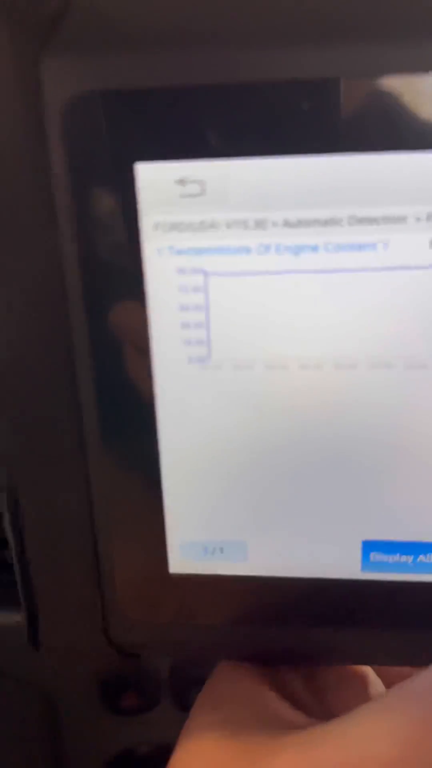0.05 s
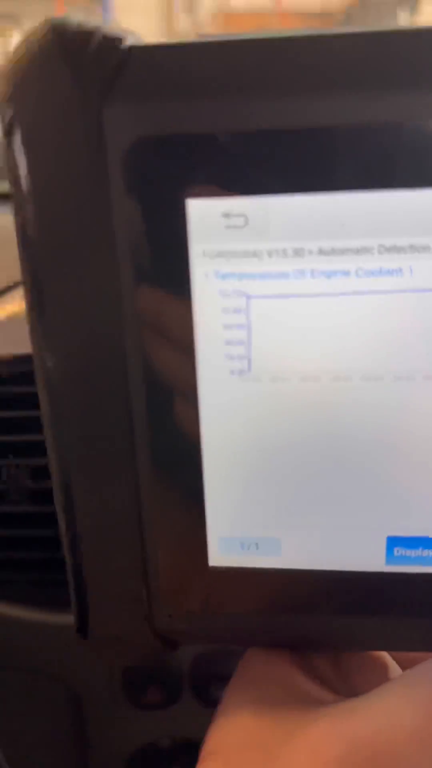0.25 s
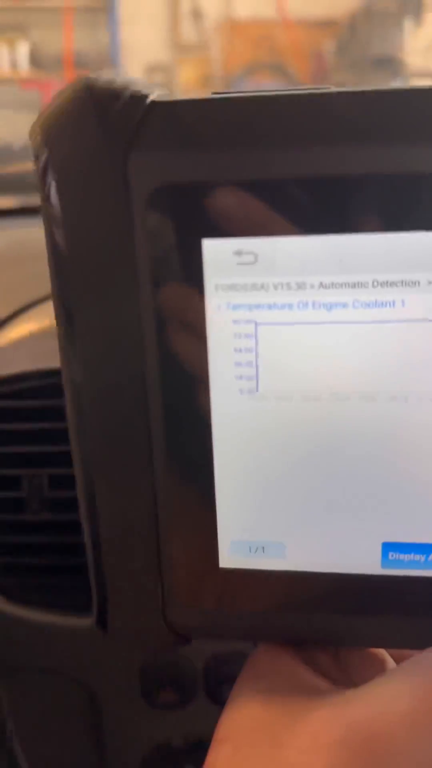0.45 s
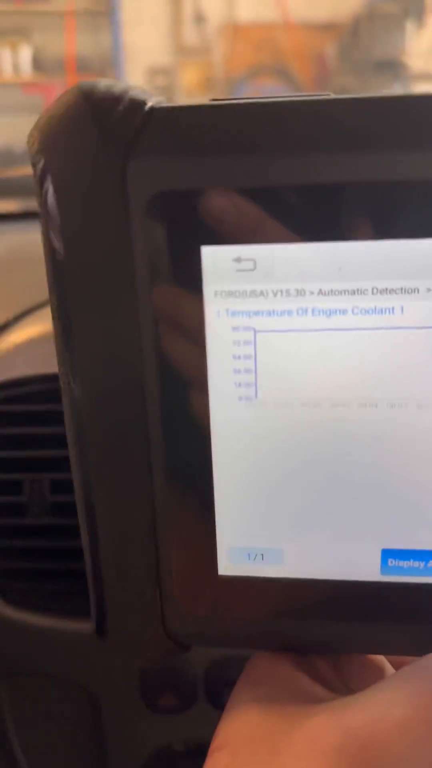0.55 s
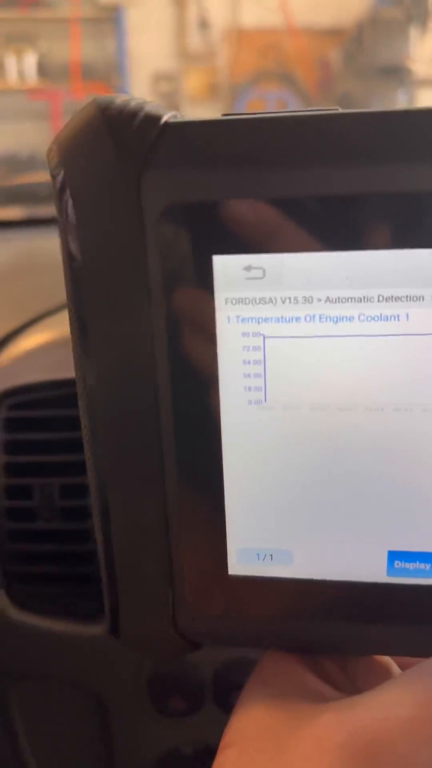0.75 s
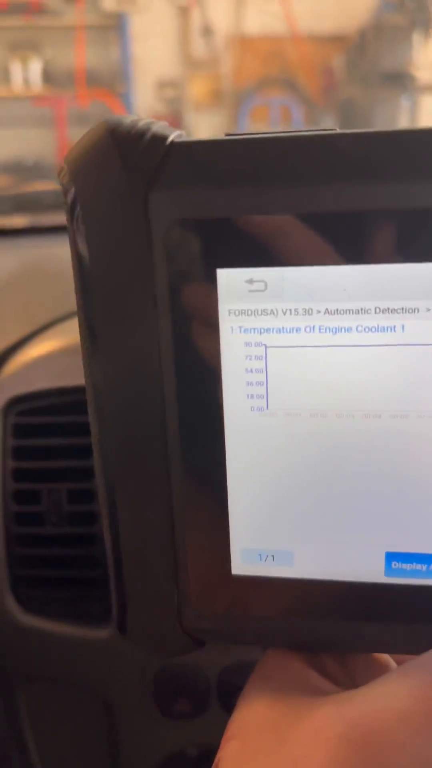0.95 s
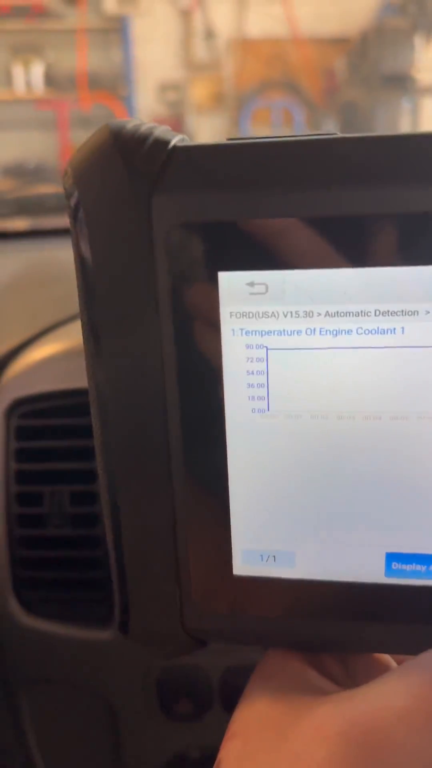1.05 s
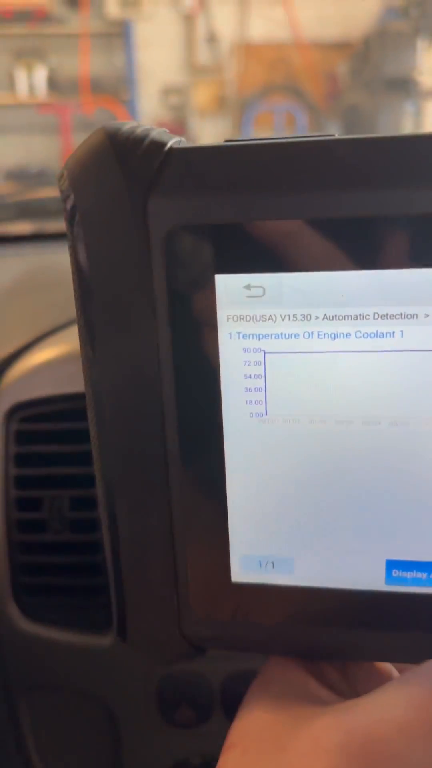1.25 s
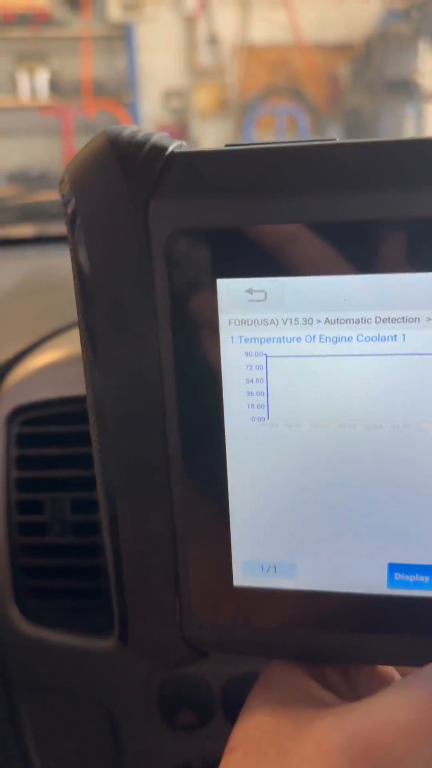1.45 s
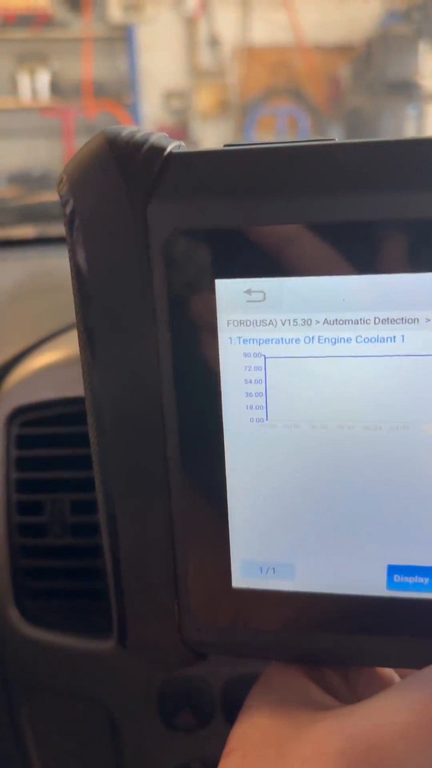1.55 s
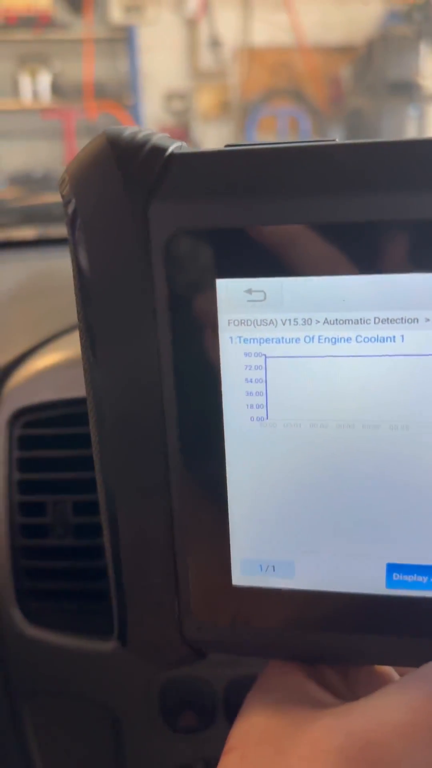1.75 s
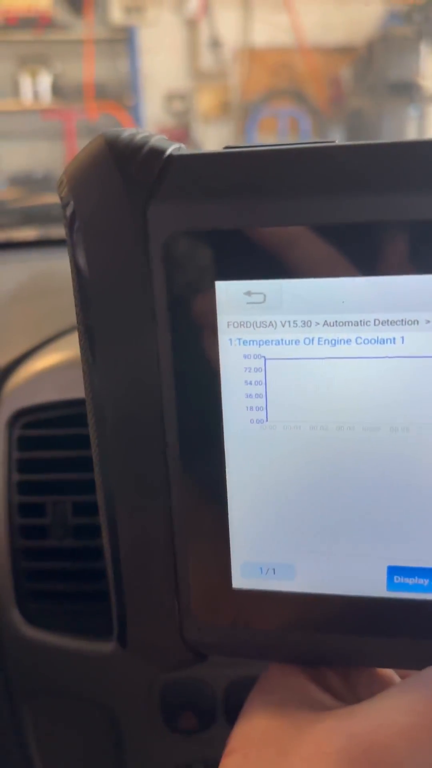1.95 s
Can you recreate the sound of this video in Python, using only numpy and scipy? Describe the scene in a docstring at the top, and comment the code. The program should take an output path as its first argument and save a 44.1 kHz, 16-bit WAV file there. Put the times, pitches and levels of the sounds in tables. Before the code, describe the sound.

A six-cylinder car engine idles in a deep, steady boom inside the cabin, with faint whine and soft rush; a hand rustles lightly early, plastic ticks once late, then the idle dips slightly as rustling returns.

```python
"""A V6 car engine idles, heard inside the cabin on the two ports of a hand-held phone.
From the start its firings boom as a sum of crank orders, under an alternator whine and accessory hums
of wavering pitch, with mechanical rush and hiss as shaped noise. The hand rustles early on, as bursts
of resonant noise; near 1.6 s plastic ticks, as decaying modes. Towards the end the idle sags, uneven
orders and low rush swell, the boom dips and the hand rustles again."""
import sys
import numpy as np
from scipy import signal
from scipy.fft import rfft, irfft
from scipy.io import wavfile
from scipy.ndimage import uniform_filter1d

SR = 44100
rng = np.random.default_rng(int(sys.argv[2]) if len(sys.argv) > 2 else 0)


def transcribe(signal):
    """Save signal, clipped to [-1, 1], as a 16-bit WAV file at the path in sys.argv[1]."""
    frames = np.atleast_2d(signal).T
    limited = np.clip(frames, -1, 1)
    pcm = np.round(limited * 32767).astype(np.int16)
    wavfile.write(sys.argv[1], SR, pcm)


def volts(x):
    """Linear amplitude factor 10**(x/20) for a level x in dB, scalar or array-like."""
    e = np.asarray(x, float) / 20
    return 10 ** e


N = 88200

# The idle speed. Each row: time in seconds, crank speed in rpm.
CRANK_SPEED = [(0.0, 891.0), (0.2, 885.4), (0.4, 881.6), (0.6, 888.0), (0.8, 890.2), (1.0, 881.8),
               (1.2, 879.8), (1.4, 881.6), (1.6, 877.7), (1.72, 871.1), (1.82, 863.2), (1.92, 866.6),
               (2.0, 866.7)]
START_TURNS = .185  # crank position at the start, in turns
# The engine's harmonic recipe; 3 is the firing, steps of 1.5 one bank, steps of .5 single cylinders.
# Each row: multiple of crank speed, rms level in dB before its drift.
ORDER_LEVELS = [(2, -56), (3, -21), (4, -55), (4.5, -32.7), (6, -29.5), (7.5, -39), (8, -53), (9, -35.5),
                (10.5, -46), (11.5, -52), (12, -40), (13, -55), (13.5, -40.5), (14, -49), (14.5, -47.5),
                (15, -35.5), (15.5, -43), (16, -56), (16.5, -55), (17.5, -52), (18, -48), (20.5, -59),
                (21, -56), (24, -61), (27, -58), (30, -63)]
# The firing boom as the phone moves in the cabin's standing wave. Each row: time in seconds, gain in dB.
BOOM_DRIFT = [(0, 2.5), (.25, 0), (.45, -0.5), (.65, 1.5), (.92, 1.4), (1.02, -0.5), (1.3, 0.1),
              (1.65, -0.5), (1.82, -5), (1.92, -0.5), (2, -8.5)]
# Drift at twice the firing rate. Each row: time in seconds, gain in dB.
SECOND_FIRING_DRIFT = [(0, 0), (.12, -1), (.36, -1), (.5, -1), (.72, -2.5), (.9, 1), (1.1, -2), (1.25, 0),
                       (1.43, -.5), (1.6, 2), (1.85, 1), (2, 1)]
# Drift at five times the firing rate. Each row: time in seconds, gain in dB.
FIFTH_FIRING_DRIFT = [(0, -1), (1.74, .5), (1.86, -4.5), (2, 1)]
# Uneven orders and low rush grow as the idle sags. Each row: time in seconds, gain in dB.
STUMBLE = [(0, -2.5), (1.3, 1), (1.6, 2), (1.8, 5), (2, 8)]
# The orders that follow the stumble, as multiples of crank speed.
STUMBLE_ORDERS = (14.5, 18, 20.5)
# Stereo balance of the engine. Each row: frequency in Hz, left over right in dB.
ENGINE_BALANCE = [(44, .4), (66, .6), (88, 1.5), (130, .9), (250, .9), (700, 5)]
# The alternator whine. Each row: time in seconds, pitch in Hz, rms level in dB, both before wavering.
WHINE = [(0, 1410, -62), (.23, 1409, -59), (.33, 1400, -65), (.42, 1407, -60.5), (.58, 1405, -60.5),
         (.72, 1412, -57.5), (.81, 1412, -60), (.95, 1413, -57.5), (.99, 1398, -62.5), (1.3, 1402, -62),
         (1.6, 1395, -61), (1.72, 1397, -63.5), (1.82, 1412, -61.5), (2, 1388, -64)]
# Accessory hums. Each row: multiple of crank speed, pitch wander in Hz, level in dB before its swell,
# left over right in dB.
HUMS = [(41.54, 8, -62.5, 7.5), (52.08, 2.7, -70, 11.5)]
# Swell shared by the hums. Each row: time in seconds, gain in dB.
HUM_SWELL = [(0, 4.5), (.1, -6.5), (.2, 1.5), (.5, -1), (.6, -5.5), (.73, 2.5), (.88, -7), (1.05, 2),
             (1.5, -2.5), (1.6, 3.5), (1.72, 2.5), (1.85, 2), (2, 4.5)]
# Rush heard alike by both ports. Each row: frequency in Hz, density in dB per Hz before the port trims.
RUSH_MID = [(20, -88.5), (40, -73), (200, -73.5), (280, -72.5), (370, -76), (500, -80), (1000, -89),
            (1600, -93), (2100, -99), (2500, -98.5), (3300, -101), (4100, -101), (5100, -106), (7000, -104),
            (8500, -111), (9700, -111), (10300, -116), (10420, -150)]
# Rush that differs between the ports. Each row: frequency in Hz, density in dB per Hz before the trims.
RUSH_SIDE = [(20, -100), (60, -89), (310, -82), (600, -88), (1300, -103), (1700, -108), (2300, -100),
             (3000, -93.5), (3500, -101), (4500, -103), (4850, -99), (5200, -106), (5500, -102),
             (6000, -111), (6600, -107), (8000, -107), (8700, -112), (9800, -110), (10700, -116),
             (11300, -132), (13000, -124), (15600, -126), (15900, -150)]
# Narrow hiss. Each row: centre in Hz, width in Hz, rms level in dB before the port trims.
HISS = [(5490, 260, -75.5), (5760, 200, -80)]
# Hand rustles. Each row: start in seconds, length in seconds, level in dB before its swell and flutter,
# centre in Hz, width in Hz.
RUSTLES = [(.17, .22, -74.5, 3630, 400), (.2, .22, -70.5, 3200, 2200), (.4, .11, -72, 3150, 1300),
           (1.85, .3, -71, 2350, 1300)]
# Modes of the ticking plastic. Each row: frequency in Hz, relative level in dB, 60 dB decay in seconds.
TICK_MODES = [(2600, 0, .004), (3300, -2, .005), (2050, -8, .012), (2580, -12, .04), (7800, -12, .02)]


def table(rows, at, log=False):
    """Read every column after the first at given places, between rows by straight or log steps."""
    rows = np.array(rows, float)
    scale = np.log if log else np.asarray
    return np.array([np.interp(scale(at), scale(rows[:, 0]), column) for column in rows.T[1:]])


def walk(rate):
    """Random levels held for 1 / rate seconds and slewed twice; spread near 1."""
    hold = int(SR / rate)
    steps = np.repeat(rng.standard_normal(N // 400), hold)[:N]
    return 1.7 * uniform_filter1d(uniform_filter1d(steps, hold), hold)


def coloured(rows, white):
    """Shape a white noise spectrum to a density in dB per Hz."""
    hz = np.arange(1, N // 2 + 2) * SR / N
    gain = volts(table(rows, hz, log=True)[0])
    return irfft(white * gain, N) * np.sqrt(SR / 2)


def band(hz, width_hz, db):
    """Noise through one resonance twice, at an rms level in dB."""
    peak = signal.iirpeak(hz, hz / width_hz, fs=SR)
    once = signal.lfilter(*peak, rng.standard_normal(N))
    twice = signal.lfilter(*peak, once)
    return twice * volts(db) / np.std(twice)


def tone(gain, phase, pan_db, lag_rad):
    """Place a sine of rms gain on the two ports, panned left over right, the right one lagging."""
    left = np.sqrt(2) * gain * np.sin(phase)
    right = np.sqrt(2) * gain * np.sin(phase - lag_rad)
    return np.array([left * volts(pan_db / 2), right * volts(-pan_db / 2)])


def cabin_lag(order, hz):
    """Phase lag in radians of an order on its way into the cabin, by firing, bank or single cylinder."""
    if order % 3 == 0:
        # a panel resonance delays the firing orders above it
        panel_hz, panel_width_hz = 237, 45
        return 2 * np.arctan2(hz * panel_width_hz, panel_hz ** 2 - hz ** 2)
    if order % 1.5 == 0:
        # the bank beat lags, and above a knee comes by a longer pipe
        bank_rad, knee_hz, pipe_delay_s = .72, 105, .0083
        return bank_rad + 2 * np.pi * pipe_delay_s * max(hz - knee_hz, 0)
    # other orders are reversed up to the ringing order, then lag by a limited angle
    ring_order, most_rad = 14, 1.5
    return min(order - ring_order, most_rad) if order > ring_order else np.pi


def engine(t, turns, crank_hz):
    """Firing pressure as sines locked to the crank, each wavering a little in level and phase."""
    scatter_db, sway_rad, rate_per_s = .9, .12, 11
    drift_db = {3: table(BOOM_DRIFT, t)[0], 6: table(SECOND_FIRING_DRIFT, t)[0],
                15: table(FIFTH_FIRING_DRIFT, t)[0]}
    for order in STUMBLE_ORDERS:
        drift_db[order] = table(STUMBLE, t)[0]
    out = 0
    for order, db in ORDER_LEVELS:
        hz = order * crank_hz
        loose = .3 if order <= 4.5 else 1  # the lowest orders waver less
        gain = volts(db + loose * scatter_db * walk(rate_per_s) + drift_db.get(order, 0))
        sway = loose * sway_rad * walk(rate_per_s)
        phase = 2 * np.pi * order * turns - cabin_lag(order, hz) + sway
        if order == 3:
            # the boom falls behind as it weakens
            phase = phase - .12 + .06 * drift_db[3]
        pan_db = table(ENGINE_BALANCE, hz, log=True)[0]
        out = out + tone(gain, phase, pan_db, lag_rad=.072)
    return out


def alternator(t):
    """The alternator whine: one sine, its pitch and level trembling around their drift."""
    hz, db = table(WHINE, t)
    phase = 2 * np.pi * np.cumsum(hz + 2.5 * walk(40)) / SR
    gain = volts(db + 1.5 * walk(70))
    return tone(gain, phase, pan_db=4.5, lag_rad=.66)


def accessory_hums(t, turns):
    """Belt-driven hums: sines that follow the crank, with pitch wander and a shared swell."""
    out = 0
    for order, wander_hz, db, pan_db in HUMS:
        wander_turns = np.cumsum(wander_hz * walk(35)) / SR
        phase = 2 * np.pi * (order * turns + wander_turns)
        gain = volts(db + table(HUM_SWELL, t)[0] + 2.56 * walk(25))
        out = out + tone(gain, phase, pan_db, lag_rad=.24)
    return out


def rush(t, turns):
    """Broad mechanical noise with narrow hiss; its common part pulses slightly with the firings."""
    flicker_db = .4
    pulse = volts(.6 * np.cos(2 * np.pi * 3 * turns) + flicker_db * walk(12.03))
    common = rfft(rng.standard_normal(N))
    apart = rfft(rng.standard_normal(N))
    mid = coloured(RUSH_MID, common) * pulse
    mid = mid + sum(band(*row) for row in HISS)
    # low rush follows the stumble
    mid = mid + band(286, 190, -62.5) * (volts(table(STUMBLE, t)[0]) - 1)
    # part of the differing rush is the common rush turned a quarter cycle
    share = .39
    side_noise = share * 1j * common + np.sqrt(1 - share ** 2) * apart
    side = coloured(RUSH_SIDE, side_noise) * volts(flicker_db * walk(20))
    return np.array([(mid + side) * volts(-.64), (mid - side) * volts(-1.02)])


def hand_rustles(t):
    """Skin rubbing the case: resonant noise bursts that swell and fade, with a shared flutter."""
    out = 0
    for start_s, length_s, db, hz, width_hz in RUSTLES:
        progress = np.clip((t - start_s) / length_s, 0, 1)
        swell = np.sin(np.pi * progress) ** .5
        out = out + swell * band(hz, width_hz, db)
    return out * volts(1.2 * walk(100))


def plastic_tick(t):
    """Plastic ticks once: a sum of decaying modes, softened by a very short rise."""
    age = np.maximum(t - 1.5957, 0)  # seconds since the tick
    tick = 0
    for hz, db, t60 in TICK_MODES:
        decay = np.exp(-np.log(1000) * age / t60)
        tick = tick + volts(db) * np.cos(2 * np.pi * hz * age) * decay
    rise = 1 - np.exp(-age / .00025)
    tick = tick * rise * volts(-37)
    # the right port hears it 3 samples later and slightly louder
    return np.array([tick, np.roll(tick, 3) * volts(.5)])


def scene():
    """Lay the hand and the tick over the running engine, its accessories and its rush."""
    t = np.arange(N) / SR
    speed_hz = table(CRANK_SPEED, t)[0] / 60
    turns = START_TURNS + np.cumsum(speed_hz) / SR
    running = engine(t, turns, speed_hz.mean()) + alternator(t) + accessory_hums(t, turns) + rush(t, turns)
    return running + hand_rustles(t) + plastic_tick(t)


def low_pass(x):
    """Removes everything above the highest recorded frequency."""
    return signal.sosfilt(signal.butter(12, 15650, fs=SR, output="sos"), x)


def record(dry):
    """Hand over the finished two-port mix."""
    return low_pass(dry)


dry = scene()
out = record(dry)
transcribe(out)
```